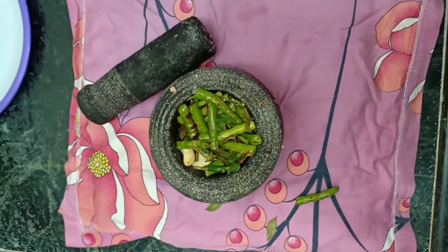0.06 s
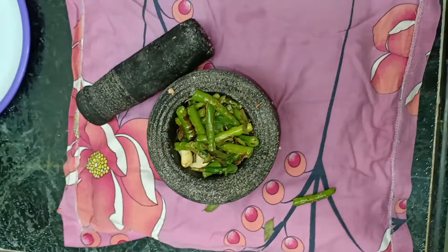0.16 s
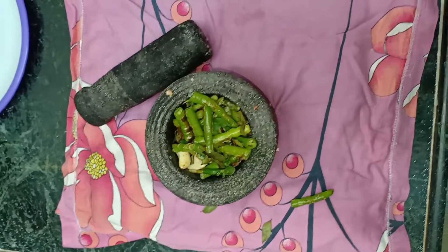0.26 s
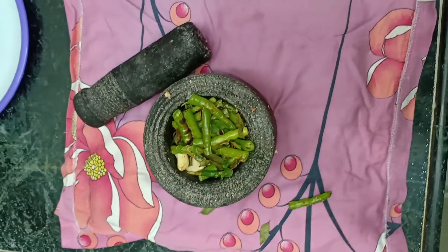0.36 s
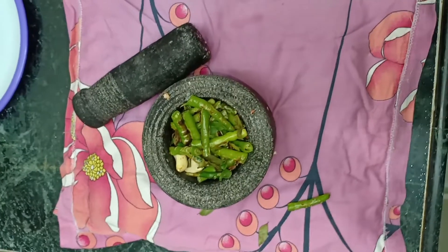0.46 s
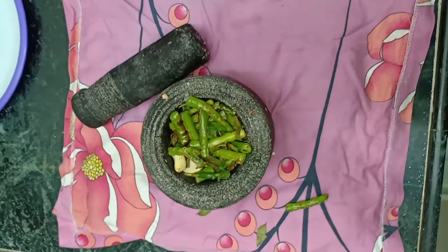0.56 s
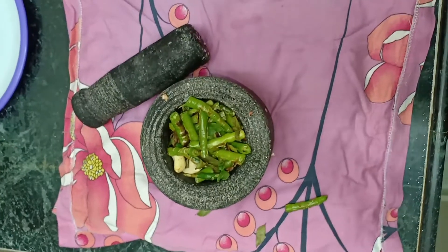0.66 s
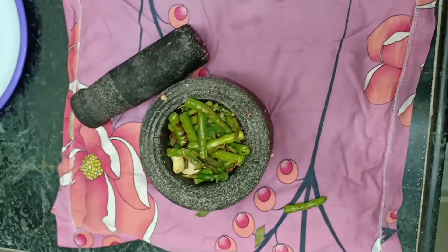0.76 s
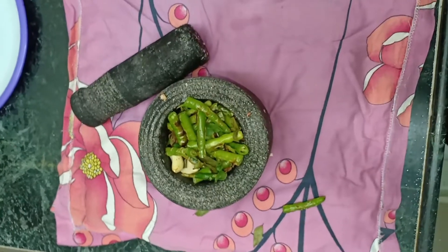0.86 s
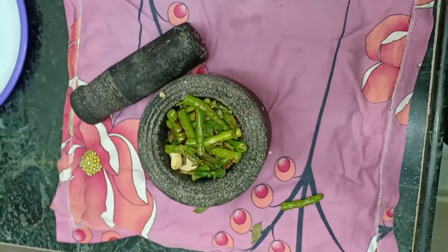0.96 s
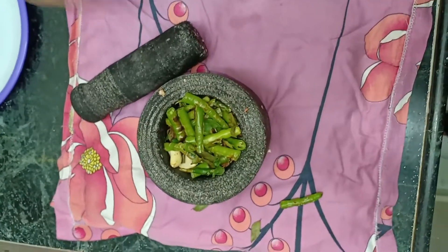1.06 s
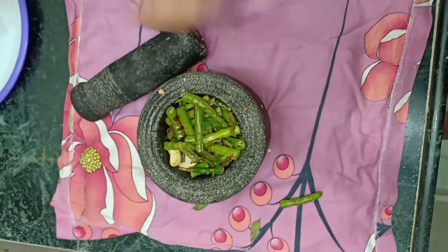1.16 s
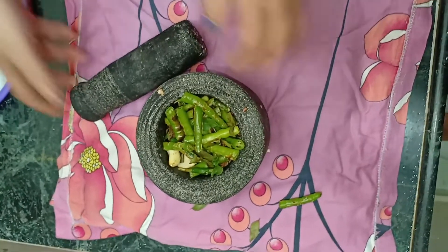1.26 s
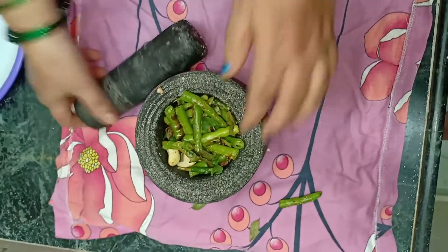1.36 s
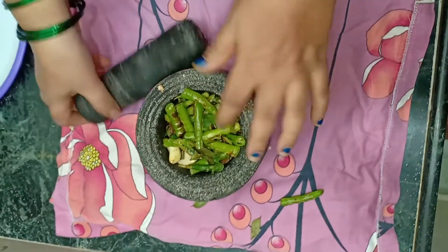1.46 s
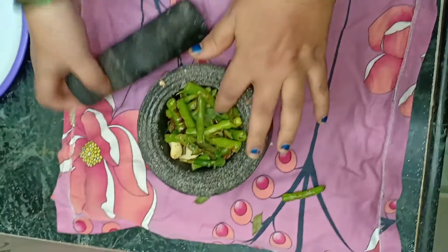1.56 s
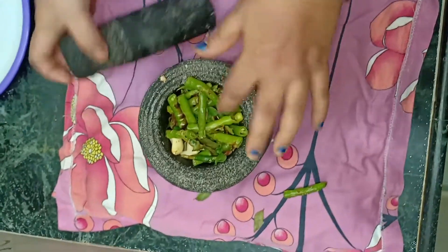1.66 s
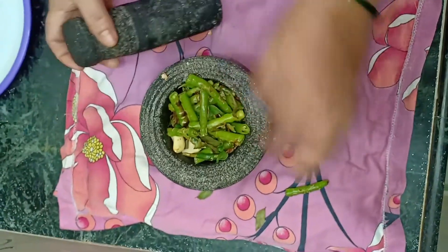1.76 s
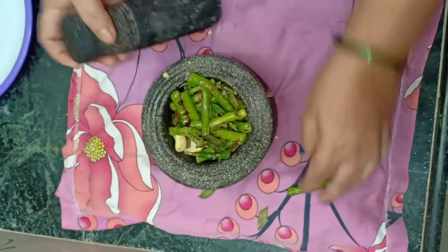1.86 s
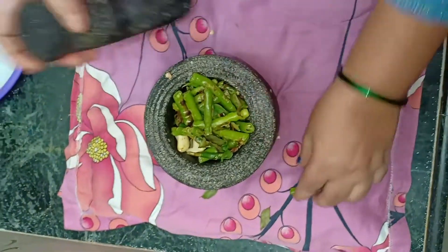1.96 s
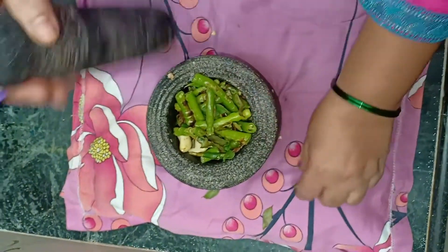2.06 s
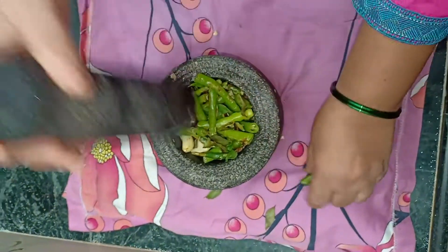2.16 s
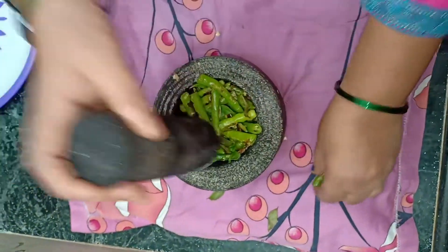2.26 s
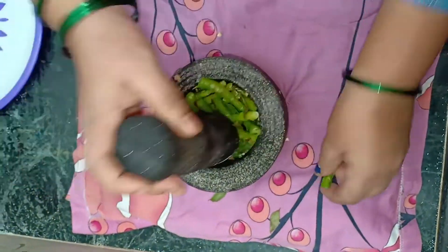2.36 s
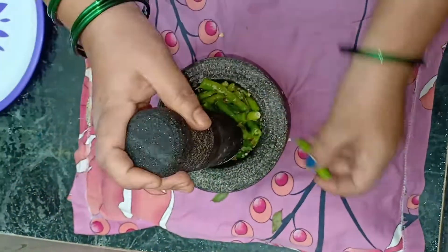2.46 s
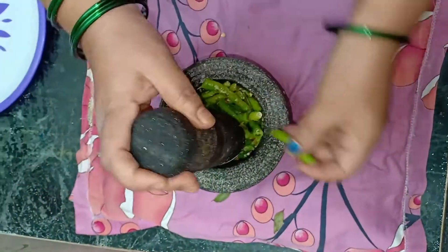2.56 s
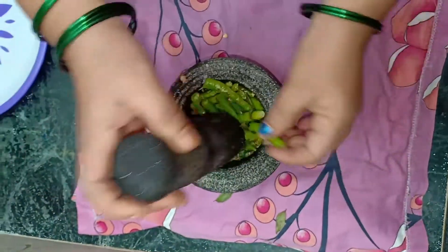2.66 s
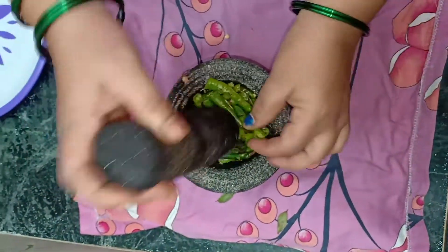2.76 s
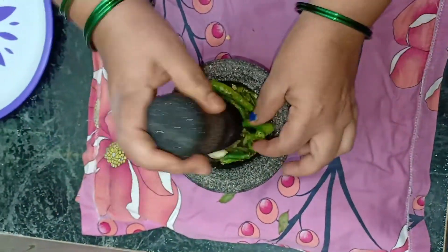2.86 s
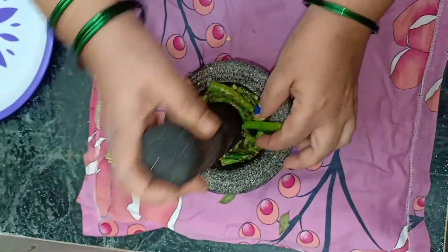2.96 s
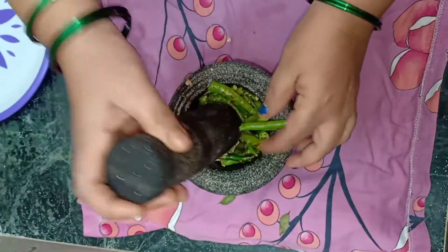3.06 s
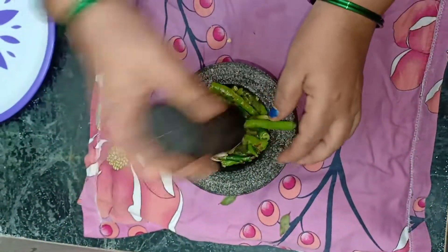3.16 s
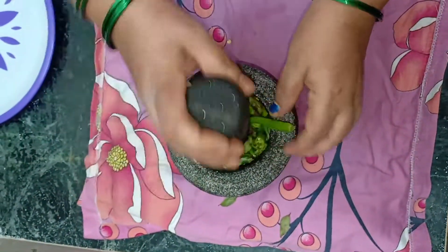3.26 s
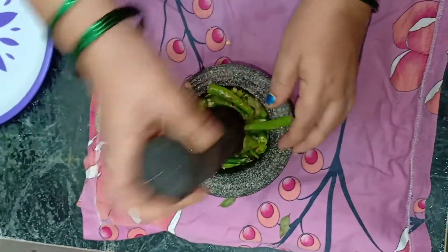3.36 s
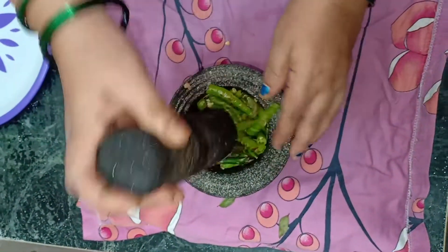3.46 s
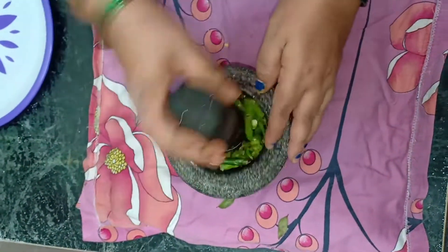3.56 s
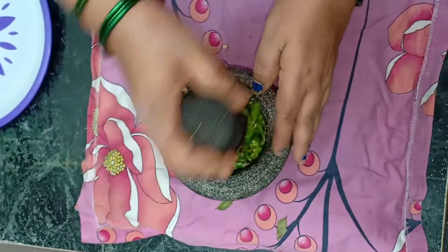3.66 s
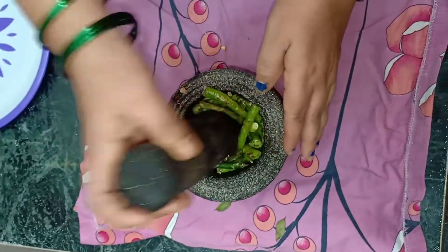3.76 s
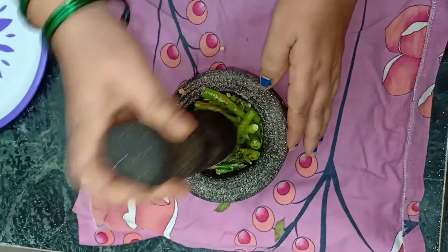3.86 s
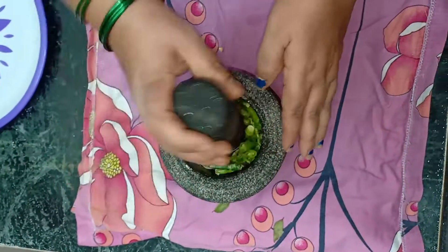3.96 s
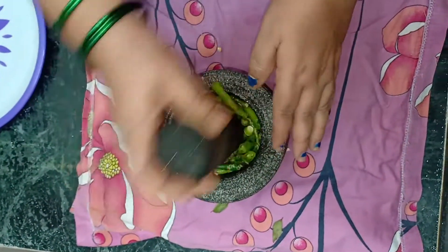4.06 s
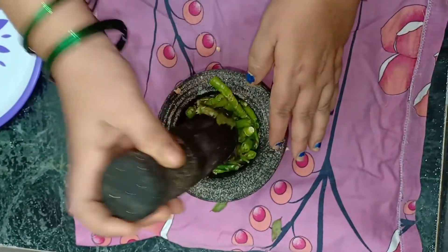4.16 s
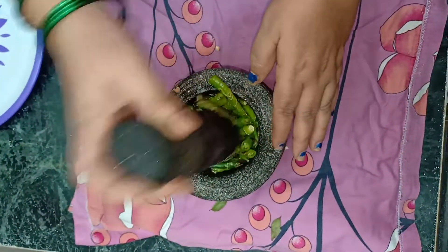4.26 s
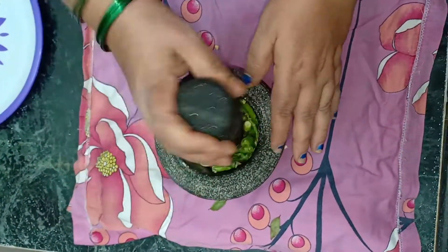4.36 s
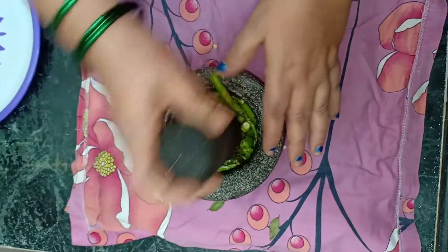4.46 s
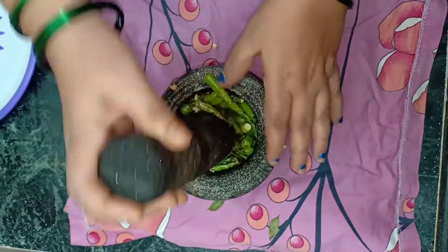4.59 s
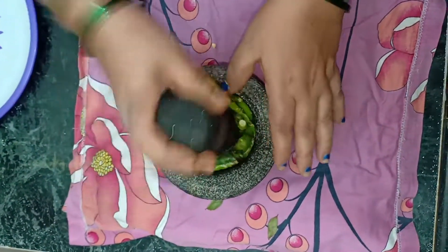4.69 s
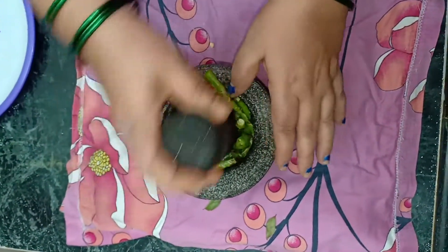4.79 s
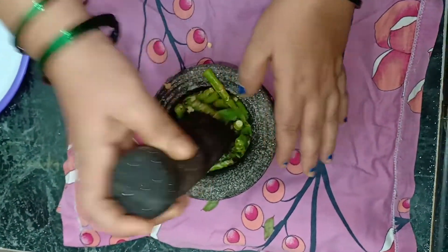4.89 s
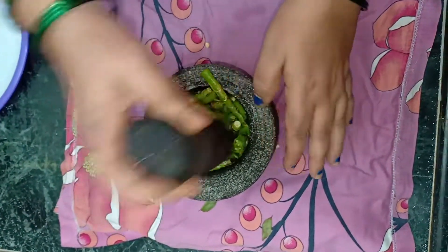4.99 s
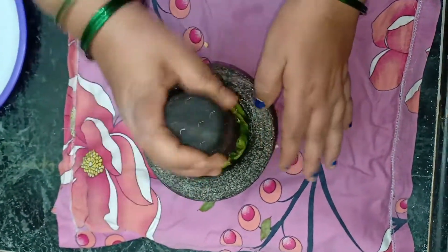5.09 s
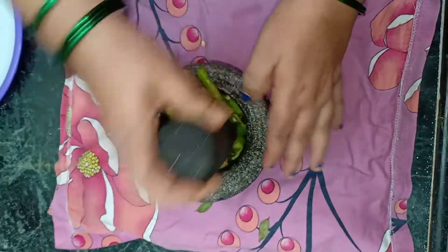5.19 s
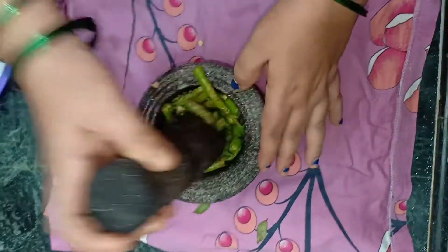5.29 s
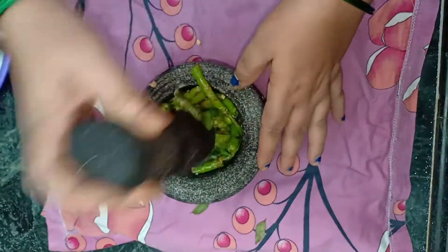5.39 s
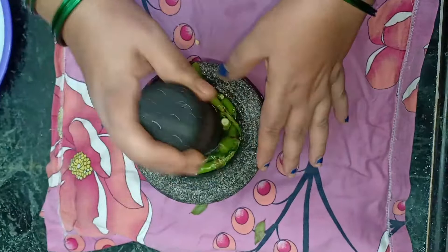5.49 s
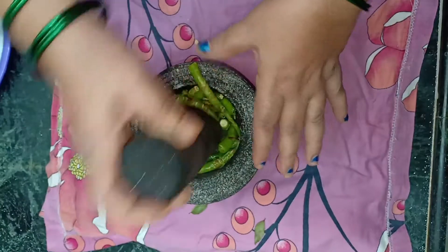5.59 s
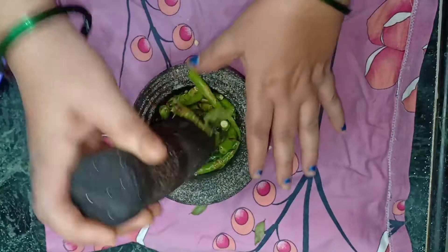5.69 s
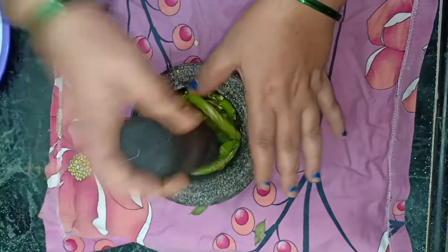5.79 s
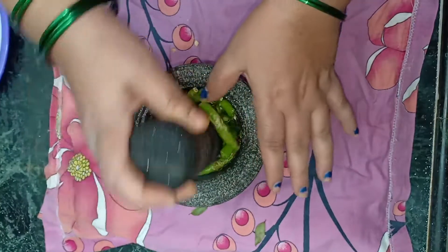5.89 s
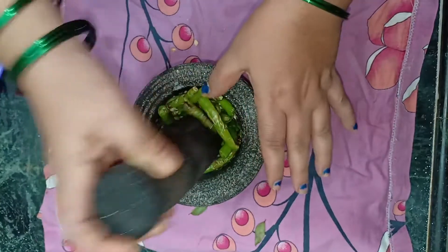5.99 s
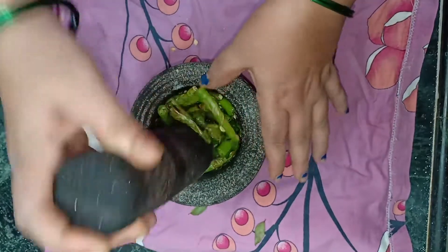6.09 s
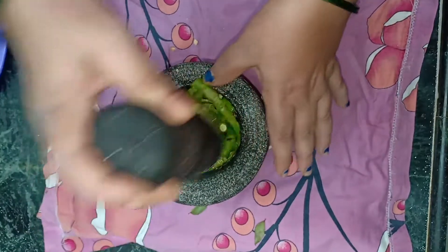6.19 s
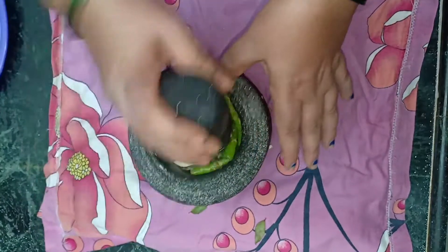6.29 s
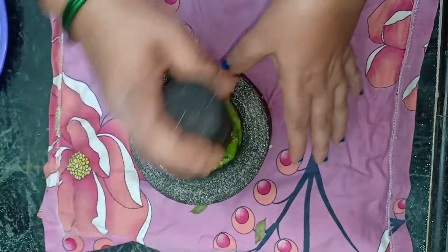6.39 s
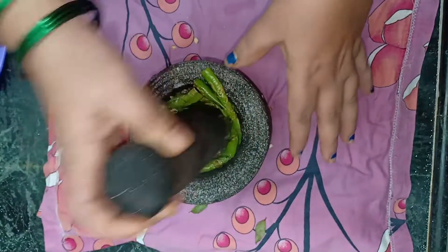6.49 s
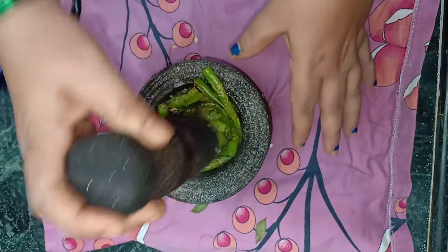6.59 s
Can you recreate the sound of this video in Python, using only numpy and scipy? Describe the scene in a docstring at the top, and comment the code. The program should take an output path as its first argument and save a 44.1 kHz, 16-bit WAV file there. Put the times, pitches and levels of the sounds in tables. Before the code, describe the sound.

A small, hard-surfaced kitchen with a soft low house hum and barely audible appliance tones. From 0.2 to 0.6 s a dish bumps and rings off to the right, loudest at 0.4 s, carried mostly by the room. Then it is nearly quiet, with a faint squeak at 1.4 s and a small snap at 1.55 s. At about 2.2 s, after quick snaps, a stone pestle cracks on the bare mortar rim with a short ring and low thud; pods rustle. From 2.7 s pounding starts, a stroke every 0.36 s or so: brief crackle, swelling wet crunch, deep booming thud. The first is light, later ones fuller, with crisp snaps between and a tiny squeak near 4.5 s. A crisp snap stands out around 4.95 s. The stroke at 6.2 s is very gentle; at 6.6 s a lighter rim knock leads into a strong, darker squelch. Microphones are close, in stereo.

```python
"""A dish clatters off to the right, across a small tiled kitchen over soft house noise.
Close to the two microphones, a stone pestle knocks on the rim of a stone mortar on a cloth-covered counter,
then pounds green chillies and garlic in fairly steady strokes. Each stroke is a swelling wet crunch, a swarm
of tiny clicks, then a thud of decaying low modes that sets the room booming. Stone and dish are shaped clicks
with ringing modes; single snaps, rustles and short gliding squeaks come from the pods."""
import sys
import numpy as np
from scipy import signal
from scipy.fft import rfft, irfft
from scipy.io import wavfile
from scipy.ndimage import uniform_filter1d

SR = 44100
rng = np.random.default_rng(int(sys.argv[2]) if len(sys.argv) > 2 else 0)


def generate_wav(sig):
    """Save sig (samples, or channels by samples) to the path in sys.argv[1] as 16-bit PCM at SR."""
    pcm = np.round(np.clip(np.atleast_2d(sig).T, -1, 1) * 32767).astype(np.int16)
    wavfile.write(sys.argv[1], SR, pcm)


N = 292824

# Pestle strokes. Each row: tightest squeeze in seconds, force of the blow in dB, crunch level in dB,
# brightness in dB per octave, time from first contact to the squeeze in seconds.
STROKES = [(2.7275, -32.5, -26.3, 1.2, .017), (3.0898, -21.5, -25, 1.5, .025), (3.46, -19, -20.5, -1, .019),
           (3.845, -22, -20, 0, .022), (4.2402, -17, -18.5, -1.5, .022), (4.6145, -15.5, -17.5, -2, .023),
           (4.9715, -23.5, -17.8, .8, .022), (5.354, -18.5, -19.3, -.3, .012),
           (5.7125, -24, -21.5, -1.5, .02), (6.195, -39.5, -33, -1, .042), (6.6273, -24, -15, -2.5, .019)]
# Stone on the bare rim. Each row: start in seconds, crack level in dB, ring level in dB, thud level in dB.
RIM_KNOCKS = [(2.2059, 13, -32, -27.5), (6.6039, 1, -38.5, -36)]
# Spectrum of bursting pods. Each row: frequency in Hz, relative level in dB.
CRUNCH_SPECTRUM = [(150, -17.5), (350, -9.5), (650, -21), (1050, -7.5), (1500, -4.5), (2000, -2.5),
                   (2600, 1), (3500, -9), (5200, -5), (6800, -15), (9600, -21.5), (12000, -16.5),
                   (15000, -15.5), (16500, -46)]

# the squeeze lengthens for every dB that a blow is softer than a firm one
SQUEEZE_S, FIRM_DB, SINK_S_PER_DB = .0026, -22.5, .0005
LIFT_S = .135  # the pestle lifts this long after a blow, and the pods settle
MASH_DB_PER_S = 3  # settling and lift snaps fade as the pods are crushed


def gain_of(db):
    """Decibels to a factor."""
    return 10 ** (np.asarray(db) / 20)


def evened(x):
    """Scales to rms 1."""
    return x / np.sqrt(np.mean(x ** 2) + 1e-20)


def read(points, hz):
    """Reads a table on a log-frequency axis."""
    f, value = np.transpose(points)
    return np.interp(np.log(hz + 1), np.log(f), value)


def add(mix, s, sound):
    """Mixes a sound in at time s."""
    part = mix[..., round(s * SR):][..., :sound.shape[-1]]
    part += sound[..., :part.shape[-1]]


def click(points, tilt_db, size=2048):
    """A causal minimum-phase click of energy 1 with a given spectrum, tilted in dB per octave."""
    hz = abs(np.fft.fftfreq(size, 1 / SR))
    level_db = read(points, hz) + tilt_db * np.log2(np.clip(hz, 500, 12000))
    log_gain = np.log(gain_of(level_db))
    spectrum = np.exp(np.conj(signal.hilbert(log_gain)))
    wave = np.fft.ifft(spectrum).real[:size // 2]
    return wave / np.linalg.norm(wave)


def ring(modes, t):
    """Struck modes in stereo; reflections make each one waver in strength and phase at each microphone."""
    waver = .5  # how much reflections unsettle a mode
    out = np.zeros((2, len(t)))
    knots = np.arange(0, t[-1], .02)
    for hz, db, t60 in modes:
        tone = gain_of(db - 60 * t / t60) * np.exp(2j * np.pi * (hz * t + rng.random()))
        for side in out:
            a, b = waver * rng.standard_normal((2, len(knots)))
            wavering = np.interp(t, knots, 1 + a + 1j * b)
            side += (tone * wavering * np.exp(1j * rng.normal(0, .6))).real
    return out * np.clip(t / .002, 0, 1)


def diffuse(pair):
    """Makes two unrelated channels alike in the bass, as at two close microphones."""
    # Left-right likeness of diffuse sound. Each row: frequency in Hz, likeness from 0 to 1.
    likeness = [(30, 0.84), (150, 0.89), (350, .85), (700, 0.01), (2000, 0), (16000, 0.08)]
    a, b = rfft(pair)
    same = np.clip(read(likeness, np.fft.rfftfreq(pair.shape[1], 1 / SR)), 0, 1)
    mid = a * np.sqrt((1 + same) / 2)
    side = b * np.sqrt((1 - same) / 2)
    return irfft(np.array([mid + side, mid - side]), pair.shape[1])


def reverb(x, wet_db, early_db, early_s):
    """Quick reflections from counter and tiles, then the room's tail."""
    # Decay of the room. Each row: frequency in Hz, time to fall 60 dB in seconds.
    room_decay = [(150, 0.46), (400, 0.52), (1000, 0.55), (2500, 0.41), (5500, 0.4), (10000, 0.34),
                  (16000, 0.28)]
    t = np.arange(SR // 2) / SR
    density = .1 + 2 * t  # reflections grow denser
    taps = rng.standard_normal((2, len(t))) * (rng.random(len(t)) < density) / np.sqrt(density)
    hz, when, z = signal.stft(diffuse(taps), SR, nperseg=256)
    decay = gain_of(-60 * when / read(room_decay, hz)[:, None])
    tail = signal.istft(z * decay, SR, nperseg=256)[1][:, :len(t)]
    tail = tail * np.clip((t - .002) / .004, 0, 1)
    tail = tail / np.linalg.norm(tail, axis=1, keepdims=True)
    strength = gain_of(wet_db) + gain_of(early_db) * np.exp(-t / early_s)
    return signal.fftconvolve(x[None], tail * strength, axes=1)


def kitchen(x, wet_db, early_db, early_s, left_db, lag):
    """Direct sound (reaching the left microphone lag samples later) plus the room."""
    out = reverb(x, wet_db, early_db, early_s)
    out[0, lag:lag + len(x)] += x
    out[1, :len(x)] += x
    return out * gain_of([[left_db / 2], [-left_db / 2]])


def bursts(envelope, tilt_db, per_s, spread_db):
    """Plant cells bursting: a swarm of tiny clicks of uneven size, with the energy of its envelope."""
    n = len(envelope)
    sizes = gain_of(spread_db * np.minimum(rng.exponential(1, n), 3)) * rng.choice([-1, 1], n)
    happens = rng.random(n) < per_s / SR
    swarm = signal.fftconvolve(sizes * happens * envelope, click(CRUNCH_SPECTRUM, tilt_db))
    return swarm * np.linalg.norm(envelope) / (np.linalg.norm(swarm) + 1e-12)


def pocket(x, hz, width_hz, share):
    """The air trapped between pestle and bowl adds a short hollow resonance; the energy stays the same."""
    y = x + share * signal.lfilter(*signal.iirpeak(hz, hz / width_hz, SR), x)
    return y * np.linalg.norm(x) / (np.linalg.norm(y) + 1e-12)


def squeeze_time(force_db):
    """A firm blow bottoms out quickest; a gentle one sinks slowly into the pods."""
    return SQUEEZE_S + SINK_S_PER_DB * max(FIRM_DB - force_db, 0)


def freshness_db(s):
    """The pods grow quieter as the pounding turns them to mash."""
    return -MASH_DB_PER_S * (s - STROKES[0][0])


def room_noise():
    """Steady soft noise of the house with a few faint wavering tones from a distant appliance."""
    # Colour of the house noise. Each row: frequency in Hz, relative level in dB.
    air_spectrum = [(20, -17), (40, -20), (75, -0.5), (180, -1), (240, -4), (480, -9), (700, -11),
                    (1200, -16.5), (2400, -14.5), (4300, -26), (5250, -22), (6500, -31.5), (9000, -38),
                    (15500, -37.5)]
    # Tones of the appliance. Each row: frequency in Hz, level in dB before the left-right balance.
    appliance_tones = [(102.3, -72), (177.6, -63.5), (1744, -72.5), (5227, -78.5)]
    air_db = -53  # before the left-right balance
    t, hz = np.arange(N) / SR, np.fft.rfftfreq(N, 1 / SR)
    noise = diffuse(rng.standard_normal((2, N)))
    air = evened(irfft(rfft(noise) * gain_of(read(air_spectrum, hz)), N))
    knots = np.linspace(0, t[-1], 50)
    tones = np.zeros(N)
    for f, db in appliance_tones:
        drift = np.interp(t, knots, rng.normal(0, 0.54, len(knots)))  # phase in radians
        tones += gain_of(db) * np.sqrt(2) * np.sin(2 * np.pi * f * t + drift)
    return (gain_of(air_db) * air + tones) * gain_of([[.4], [-.4]])


def dish():
    """A dish bumps and rings off to the right, heard mostly through the room; harder bumps are brighter."""
    # Bumps of the dish. Each row: start in seconds, level in dB.
    bumps = [(0.1805, -12.3), (.305, -18.5), (.33, -20.5), (0.3905, -4.8), (.526, -19.5), (0.5449, -10.8),
             (.579, -22.5)]
    # Spectrum of a plain bump. Each row: frequency in Hz, relative level in dB.
    clack_spectrum = [(30, -42), (150, -24), (270, -13), (360, -6), (900, 0.5), (1250, -5), (1700, -4),
                      (2500, -2), (3300, -11), (4200, -16.5), (5600, -14.5), (7000, -29.5), (9000, -37),
                      (16000, -44.5)]
    # Modes of the dish. Each row: frequency in Hz, relative level in dB, time to fall 60 dB in seconds.
    dish_modes = [(334, -5.5, 0.62), (466.6, -5.5, 0.43), (667, -15, 0.43), (816, -3, 0.44),
                  (960, -7.5, 0.45), (1110, -12, .25), (1440, 0, 0.35), (1730, -14, 0.25), (2146, -4, 0.44),
                  (2230, 1, 0.47), (2313, 6.5, 0.26), (2643, -9, 0.36), (2724, -14, 0.24),
                  (3090, -11, 0.19), (3260, -7, 0.31), (3950, -15.5, 0.41), (4420, -17, 0.22),
                  (4600, -13, 0.23), (4940, -12, 0.29), (5450, -10, 0.12), (5820, -19, 0.21),
                  (6920, -20, 0.23)]
    # the ring: base level, dB gained per dB of bump, extra brightness in dB per octave
    ring_base_db, ring_follows, ring_tilt_db = -20.6, 1.1, .8
    # a bump gains this many dB per octave for every dB above a plain one
    plain_db, brightening = -9.5, .4
    out, t = np.zeros((2, N)), np.arange(SR // 2) / SR
    for s, bump_db in bumps:
        tilt_db = brightening * (bump_db - plain_db)
        clack = gain_of(bump_db) * click(clack_spectrum, tilt_db)
        add(out, s, kitchen(clack, wet_db=11.5, early_db=-1, early_s=0.032, left_db=1.5, lag=15))
        modes = [(hz, db + (tilt_db + ring_tilt_db) * np.log2(hz / 2000), t60) for hz, db, t60 in dish_modes]
        ringing = gain_of(ring_base_db + ring_follows * bump_db) * ring(modes, t)
        add(out, s, ringing * gain_of([[-1.2], [1.2]]))
    return out


def squeaks():
    """Skin and wet pods squeak on stone: brief stick-slip whistles with an unsteady pitch."""
    # Each row: middle in seconds, level in dB, length in seconds, pitch in Hz, glide in octaves.
    whistles = [(1.437, -53, .05, 2900, .45), (1.447, -54.5, 0.033, 4390, 0),
                (4.479, -45, .016, 5340, -0.042), (4.488, -54, 0.03, 5150, .1)]
    out = np.zeros(N)
    for s, db, length, hz, glide in whistles:
        u = np.linspace(-.5, .5, round(length * SR))
        unsteady = evened(uniform_filter1d(rng.standard_normal(len(u)), 40))
        pitch = hz * 2 ** (glide * u) * (1 + 0.061 * unsteady)
        whistle = np.cos(np.pi * u) ** 2 * np.sin(2 * np.pi * np.cumsum(pitch) / SR)
        add(out, s - length / 2, gain_of(db) * whistle)
    return kitchen(out, wet_db=-0.5, early_db=-4, early_s=.012, left_db=-2, lag=2)[:, :N]


def rustles():
    """Sparse crackle of pods shifting under pestle and fingers and settling after each blow."""
    # Each row: middle in seconds, level in dB, width in seconds, brightness in dB per octave.
    shifts = [(2.294, -39.5, 0.021, 2), (2.41, -54, 0.029, 1.5), (2.555, -51, 0.023, -1.5),
              (2.9, -48.5, 0.028, -2)]
    settle_db = -51  # at the first stroke
    out = np.zeros(N)
    settling = [(s + LIFT_S, settle_db + freshness_db(s), .04, 2) for s, *_ in STROKES]
    for s, db, width, tilt_db in shifts + settling:
        swell = signal.windows.gaussian(SR // 4, width * SR)
        crackle = bursts(gain_of(db) * swell, tilt_db, per_s=500, spread_db=3.5)
        add(out, s - len(swell) / SR / 2, crackle)
    return kitchen(out, wet_db=-4.5, early_db=-2, early_s=0.011, left_db=0, lag=2)[:, :N]


def snaps():
    """Single skins and stalks snap in the hollow of the bowl; faint ones follow at random as the pestle lifts."""
    # The loudest snaps. Each row: start in seconds, level in dB, brightness in dB per octave.
    loud = [(1.5574, -25, 13), (2.163, -22.5, 14.5), (2.192, -22, 4), (2.1985, -18, 7),
            (2.5047, -22.5, 3.5), (2.84, -14, 8.5), (2.9243, -20, 4), (2.9512, -15, -3), (3.615, -16, 8),
            (3.9933, -17.5, 6), (4.223, -16, 1), (4.5985, -13, 4), (4.954, -9, -2), (5.0624, -16, 6),
            (6.166, -16, 1)]
    # Spectrum of a snap. Each row: frequency in Hz, relative level in dB.
    snap_spectrum = [(200, -26), (1000, -10), (2600, 0), (5500, 1.5), (9000, -11.5), (15000, -10.5)]
    # faint snaps: highest level at the first stroke, brightness in dB per octave
    faint_db, faint_tilt_db = -23, 12
    out = np.zeros(N)
    faint = []
    for s, *_ in STROKES:
        for when, size in rng.random(size=(2, 2)):
            faint.append((s + LIFT_S * (.5 + when), faint_db + freshness_db(s) - 6 * size, faint_tilt_db))
    for s, db, tilt_db in loud + faint:
        hollow_hz = 2750 * rng.uniform(.9, 1.1)
        snap = pocket(click(snap_spectrum, tilt_db), hz=hollow_hz, width_hz=400, share=3)
        add(out, s, gain_of(db) * snap)
    return kitchen(out, wet_db=-5.5, early_db=5, early_s=0.0046, left_db=0.5, lag=2)[:, :N]


def knocks():
    """The pestle meets the bare rim: a hard crack, drawn out by the stone, and a brief ring."""
    # Spectrum of the crack. Each row: frequency in Hz, relative level in dB.
    crack_spectrum = [(25, -46), (60, -32), (130, -13), (220, 0.5), (500, -1.5), (700, -2), (1000, -0.5),
                      (1700, -2), (2200, -7), (2900, -10.5), (3600, -24), (6000, -26), (9000, -52.5),
                      (16000, -47)]
    # Modes of the stone. Each row: frequency in Hz, relative level in dB, time to fall 60 dB in seconds.
    stone_modes = [(186, 0, 0.16), (204, 8.5, 0.21), (400, -3, 0.47), (902, -1.5, 0.69), (967, 5, 0.43),
                   (997, 2, 0.62), (1045, -1, 0.42), (1105, -9, 0.2), (1976, -2, .2), (2218, -4, .3),
                   (6550, -8, 0.081), (7400, -10, 0.052)]
    out, t = np.zeros((2, N)), np.arange(SR // 2) / SR
    _, poles = signal.iirpeak(1650, 2, SR)
    # an all-pass filter: the middle band lingers for a millisecond
    crack = signal.lfilter(poles[::-1], poles, click(crack_spectrum, 0))
    for s, db, ring_db, _ in RIM_KNOCKS:
        add(out, s, kitchen(gain_of(db) * crack, wet_db=-7, early_db=1, early_s=0.021, left_db=1.0, lag=4))
        add(out, s, gain_of(ring_db) * ring(stone_modes, t))
    return out


def thuds():
    """Each blow passes through the cloth into the counter and wakes the room's low modes."""
    # Modes of counter and room. Each row: frequency in Hz, relative level in dB, time to fall 60 dB in seconds.
    boom_modes = [(74.1, -14.5, 0.49), (105.07, -9.5, 0.63), (105.4, -21, 0.6), (128.56, -10.5, 1),
                  (144.4, -15.5, 0.61), (162.3, -24.5, 0.19), (177.3, -26.5, 0.54), (189.3, -21, 0.51),
                  (203.4, -18.5, 0.45), (252, -32.5, 0.093), (288, -26, 0.18)]
    # Echoes of the thud from the walls. Each row: delay in seconds, share of the amplitude.
    wall_echoes = [(0.0148, 0.38), (0.0219, 0.17), (0.041, .25)]
    # the thud comes a fixed time plus a share of the squeeze later
    delay_s, delay_squeezes = .0083, .9
    out, t = np.zeros(N), np.arange(-SR // 44, SR) / SR
    build_up = np.clip(1 + t / 0.013, 0, 1) ** 2  # the force grows as the pods give way
    modes = np.array([gain_of(db - 60 * np.maximum(t, 0) / t60) * np.cos(2 * np.pi * hz * t)
                      for hz, db, t60 in boom_modes])
    blows = [(s + delay_s + delay_squeezes * squeeze_time(db), db) for s, db, *_ in STROKES]
    blows += [(s + 0.0066, db) for s, *_, db in RIM_KNOCKS]
    for s, db in blows:
        mode_gains = gain_of(db + rng.normal(0, 1, len(boom_modes)))  # no two blows land alike
        boom = build_up * (mode_gains @ modes)
        for echo_s, share in [(0.003, 0.89)] + wall_echoes:  # the first arrival, then the walls
            add(out, s + t[0] + echo_s, share * boom)
    return out * gain_of(-1) * gain_of([[.7], [-.7]])


def crush(t, db, width, lead_db, lead_s, tilt_db):
    """Pods crackle from first contact, then burst together as the pestle bottoms out at t = 0."""
    squeeze = np.exp(-(t / width) ** 2 / 2)
    contact = np.clip(1 + t / lead_s, 0, 1) ** 0.66 * np.exp(-np.maximum(t, 0) / 0.0093)
    crackle = bursts(gain_of(lead_db) * contact, tilt_db + 1.5, per_s=3000, spread_db=2)
    squelch = bursts(gain_of(db) * squeeze, tilt_db, per_s=9000, spread_db=3.5)
    return crackle + pocket(squelch, hz=2550 * rng.uniform(.95, 1.05), width_hz=500, share=0.74)


def crunches():
    """One crunch a stroke; the bowl scatters part of it differently to each microphone and rings faintly."""
    # Modes of the mortar, muffled by its load.
    # Each row: frequency in Hz, relative level in dB, time to fall 60 dB in seconds.
    bowl_modes = [(973, -3, 0.29), (1092, -0.5, 0.33), (1240, -6, 0.22), (1490, 7, 0.13), (2200, 7, 0.17)]
    # first-contact crackle: base level, and the dB it gains per dB of crunch
    crackle_db, crackle_follows = -28, .3
    out, t = np.zeros((2, N)), np.arange(-SR // 16, SR // 16) / SR
    for s, force_db, db, tilt_db, lead_s in STROKES:
        lead_db = crackle_db + crackle_follows * db
        width = squeeze_time(force_db)
        common = crush(t, db, width, lead_db, lead_s, tilt_db)
        scattered = crush(t, db, width, lead_db, lead_s, tilt_db)
        left, right = common + gain_of(-5.5) * scattered * np.array([[1], [-1]])
        add(out, s + t[0], np.array([np.roll(left, 2), right]))
        # the room gathers the burst from all directions, so its tail has the burst's energy and an even colour
        gathered = np.linalg.norm(common) * click(CRUNCH_SPECTRUM, tilt_db - .5)
        add(out, s, reverb(gathered, wet_db=-8, early_db=-1.5, early_s=0.01))
        # nearby tiles keep its uneven colour
        add(out, s + t[0], reverb(common, wet_db=-12.5, early_db=-11, early_s=0.0093))
        shift = rng.uniform(0.93, 1.05)  # the pestle lands somewhere else each time
        modes = [(hz * shift, level + rng.normal(0, 4.2), t60) for hz, level, t60 in bowl_modes]
        add(out, s, gain_of(db - 26.5) * ring(modes, np.arange(SR // 3) / SR))
    return out


def scene():
    """Everything in the kitchen, from the background to the mortar."""
    background = room_noise() + dish()
    pods = squeaks() + rustles() + snaps()
    return background + pods + knocks() + thuds() + crunches()


def record(dry):
    """The recorder's band limit: a low-pass at 16 kHz."""
    lowpass = signal.firwin(255, 16000, window=("kaiser", 9), fs=SR)
    return signal.oaconvolve(dry, lowpass[None], "same", axes=1)


dry = scene()
out = record(dry)
generate_wav(out)
```